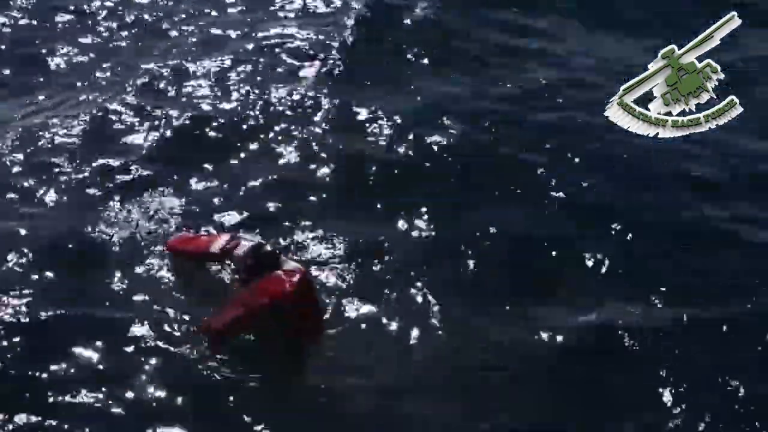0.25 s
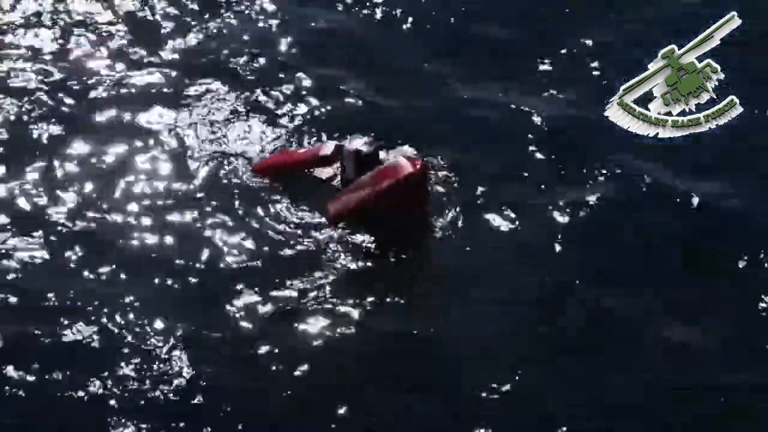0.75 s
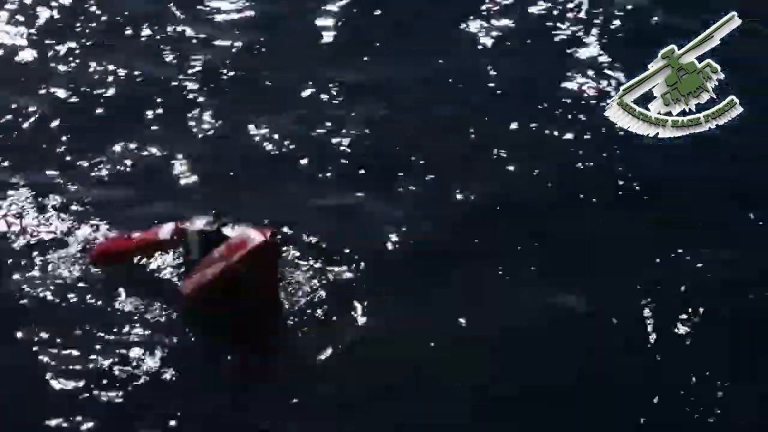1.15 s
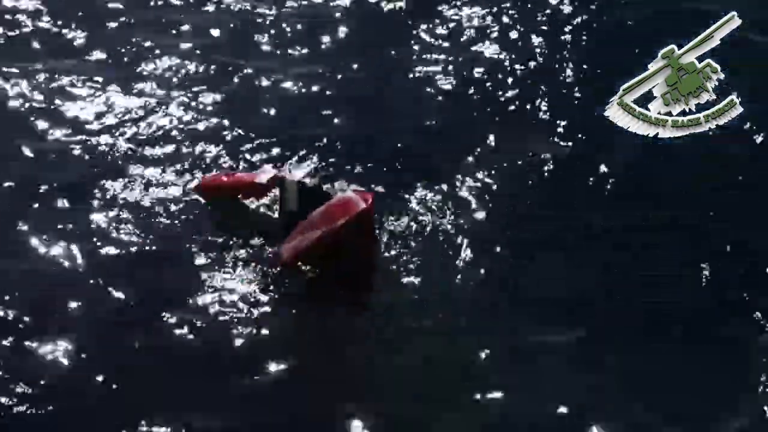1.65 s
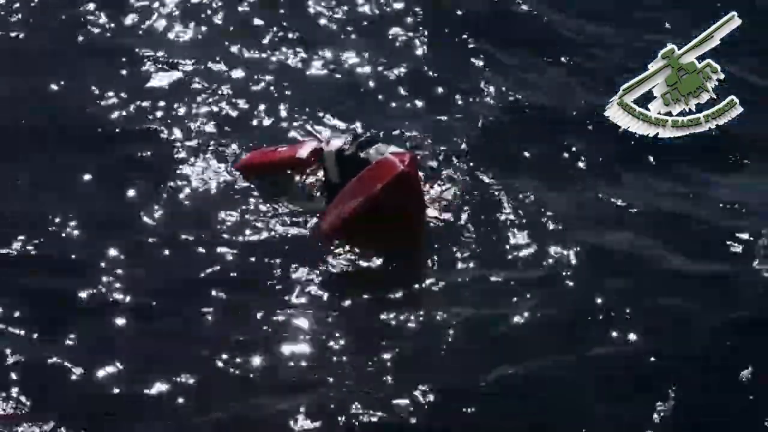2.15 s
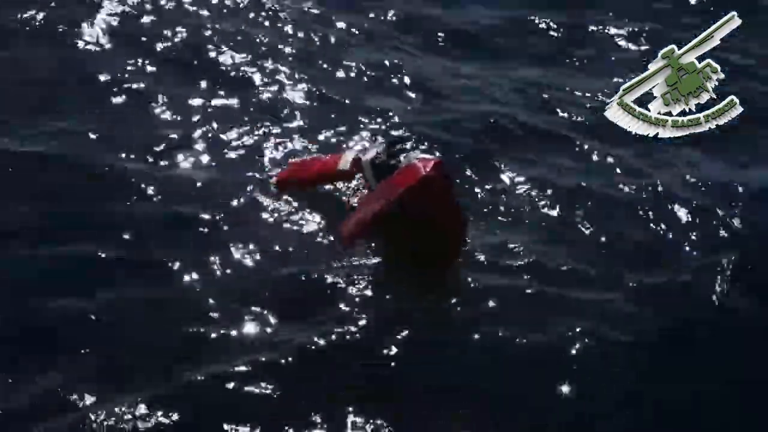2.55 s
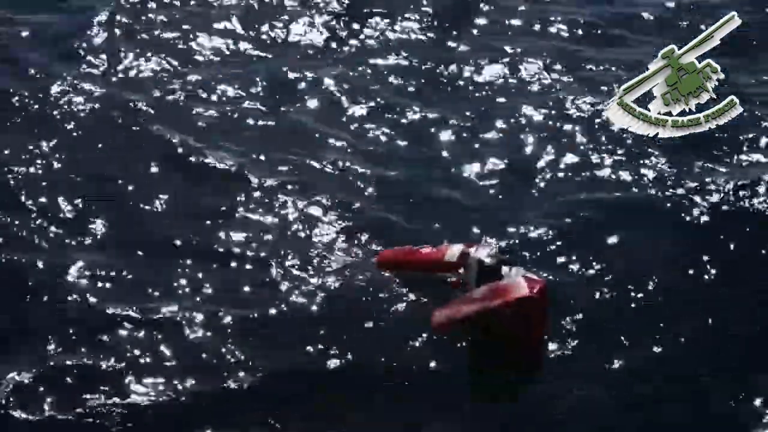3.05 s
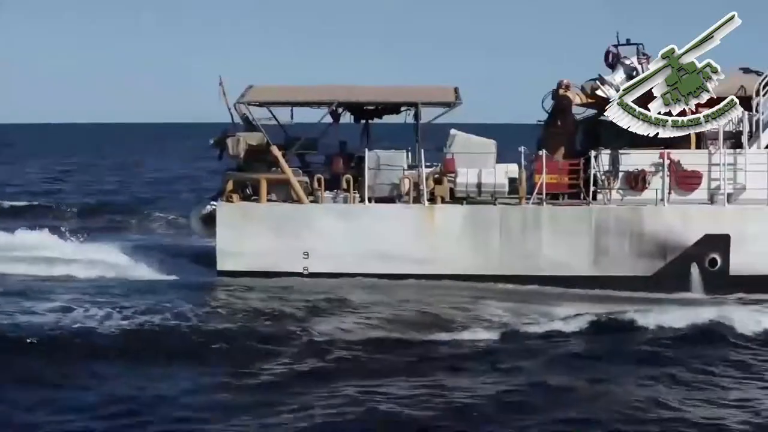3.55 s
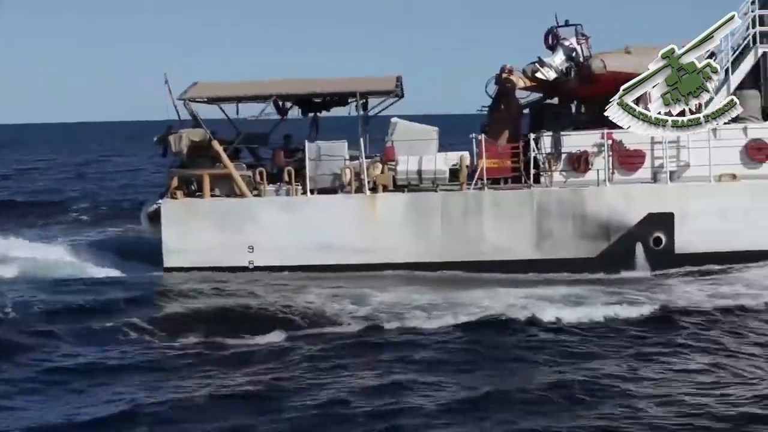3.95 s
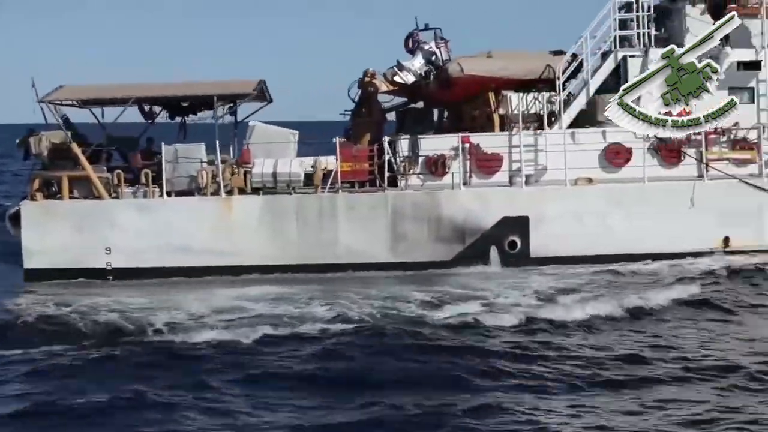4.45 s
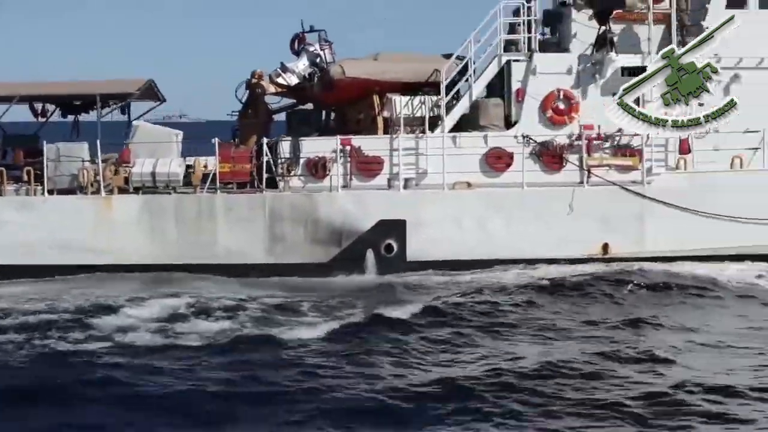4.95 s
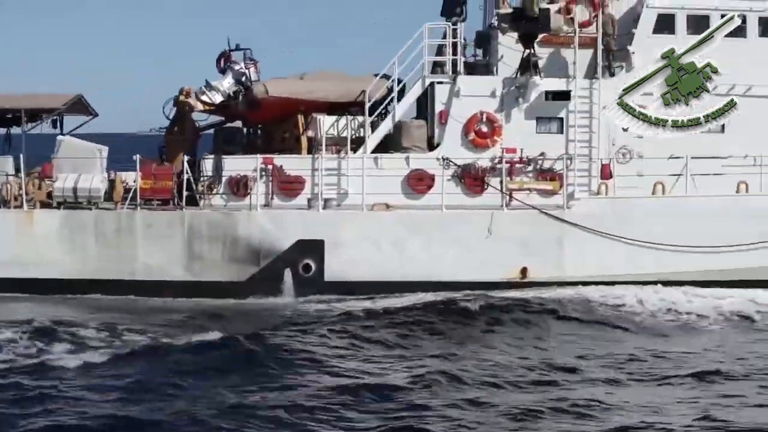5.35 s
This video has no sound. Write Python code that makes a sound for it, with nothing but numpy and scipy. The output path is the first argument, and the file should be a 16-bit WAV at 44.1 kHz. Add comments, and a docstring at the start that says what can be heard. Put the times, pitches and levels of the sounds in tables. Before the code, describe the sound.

Quiet sea wash, gusts on the microphone and a few ticks give way abruptly to a boat's loud diesel engine and rushing spray.

```python
"""On deck at sea. First, water washes round a small floating wreck under a thin whirr, while eddies of
wind pluck at the microphone and a few sharp ticks sound, the first with a ringing knock.
At 3.5 s, all at once, a patrol boat runs past close by. Its big diesel clatters and slowly gains speed,
the firings boom in the shifting resonances of the exhaust, and the wake hisses along the hull."""
import sys
import numpy as np
from scipy import signal
from scipy.fft import rfft, irfft, next_fast_len
from scipy.io import wavfile
from scipy.ndimage import uniform_filter1d, map_coordinates

SR = 44100
rng = np.random.default_rng(int(sys.argv[2]) if len(sys.argv) > 2 else 0)


def bounce(signal):
    """Save signal as a 16-bit WAV file at the path given by the first command-line argument."""
    frames = np.transpose(np.atleast_2d(signal))
    limited = np.clip(frames, -1, 1)
    pcm = np.round(limited * 32767).astype(np.int16)
    wavfile.write(sys.argv[1], SR, pcm)


N = 246959
T = np.arange(N) / SR


def from_db(db):
    """Decibels to gain."""
    return 10 ** (np.asarray(db) / 20)


def rms_one(x):
    """Scale to unit rms."""
    return x / np.sqrt(np.mean(x ** 2) + 1e-20)


def in_time(rows):
    """Each column after the time column, interpolated at every sample."""
    s, *columns = np.transpose(rows)
    return [np.interp(T, s, c) for c in columns]


def drift(rate_hz):
    """Smooth random wander with a spread of about 1."""
    hop, settle = 40, 2000
    pole = np.exp(-2 * np.pi * hop * rate_hz / SR)
    noise = rng.standard_normal(N // hop + settle + 2)
    slow = signal.lfilter([1], [1, -2 * pole, pole * pole], noise)[settle:]
    return np.interp(np.arange(N) / hop, np.arange(len(slow)), rms_one(slow))


def swell(at_s, half_width_s):
    """A bell-shaped rise and fall with peak 1."""
    return np.exp(-np.minimum(((T - at_s) / half_width_s) ** 2, 50))


def tone(turns, wobble_rad, wobble_hz):
    """A sine whose phase wanders; rms 1."""
    return np.sqrt(2) * np.sin(2 * np.pi * turns + wobble_rad * drift(wobble_hz))


def filtered(x, hz, kind):
    """A gentle low-, high- or band-pass."""
    return signal.sosfilt(signal.butter(2, hz, kind, fs=SR, output="sos"), x)


def sliding_band(x, centre_hz, width_hz):
    """A resonance whose centre may move; rms 1."""
    turn = np.exp(2j * np.pi * np.cumsum(centre_hz * np.ones(N)) / SR)
    return rms_one((filtered(x / turn, width_hz / 2, "low") * turn).real)


def coloured(x, spectrum):
    """Shape a sound to a spectrum that falls 48 dB an octave beyond its ends; rms 1."""
    hz, db = np.transpose(spectrum)
    size = next_fast_len(N)
    f = np.maximum(np.arange(size // 2 + 1) * SR / size, 1)
    octaves_outside = np.maximum(np.log2(hz[0] / f), 0) + np.maximum(np.log2(f / hz[-1]), 0)
    gain = from_db(np.interp(np.log(f), np.log(hz), db) - 48 * octaves_outside)
    return rms_one(irfft(rfft(x, size) * gain, size)[:N])


def fizz(per_s, spread_db, hiss_db):
    """Tiny bubbles of uneven size burst over a smooth hiss."""
    sizes = from_db(spread_db * np.minimum(rng.exponential(1, N), 4)) * rng.choice([-1, 1], N)
    pops = sizes * (rng.random(N) < per_s / SR)
    return rms_one(pops) + from_db(hiss_db) * rng.standard_normal(N)


# The water round the wreck, heard from the deck. Each row: time in seconds, liveliness in dB.
SEA_LIVELINESS = [(0.0, -1), (0.3, 0.5), (1.5, 1.5), (2.4, -1), (2.9, -3.5), (3.2, -4), (3.47, -7.5)]
# Its low wash and its bright ripples. Each row: frequency in Hz, relative level in dB.
WASH_SPECTRUM = [(15, -48), (25, -6.5), (70, -22), (113, -1.5), (152, -6.5), (226, -3.5), (315, -10),
                 (432, -6.5), (475, -12.5), (514, -7), (612, -16.5), (752, -14), (1100, -36), (1430, -55),
                 (2420, -120)]
RIPPLE_SPECTRUM = [(530, -29), (900, -2), (1090, -7.5), (1270, -8), (1550, -5), (1680, -4.5), (2330, -10.5),
                   (2590, -12.5), (3960, -25), (5700, -33.5), (7380, -27.5), (8400, -33), (9900, -27.5),
                   (13300, -41.5), (14900, -51)]

def sea(wash_db=-49.5, ripple_db=-58):
    """A low wash and fizzing ripples rise and fall with the water, the wash more widely."""
    lively_db, = in_time(SEA_LIVELINESS)
    wash_gain = from_db(wash_db + 1.38 * lively_db + 1.2 * drift(32))
    wash = wash_gain * coloured(rng.standard_normal(N), WASH_SPECTRUM)
    ripple_gain = from_db(ripple_db + lively_db + .5 * drift(21))
    bubbles = fizz(per_s=3000, spread_db=16, hiss_db=24)
    return wash + ripple_gain * coloured(bubbles, RIPPLE_SPECTRUM)


# A faint whirr out over the water. Each row: time in seconds, level in dB.
WHIRR_LEVEL = [(0, -61), (.65, -61.5), (.8, -56.5), (1.3, -58), (1.5, -60), (1.7, -56), (2.15, -56.5),
               (2.3, -64.5), (2.6, -60), (3.45, -64)]
# Where it sings out. Each row: time of the peak in seconds, level in dB, pitch in Hz.
WHIRR_NOTES = [(0.22, -50, 1330), (1.06, -57, 1265), (1.61, -54.5, 1410), (1.65, -51.5, 1280),
               (1.81, -56, 1226), (2.51, -58.5, 1345), (2.86, -61, 1350), (3.16, -57, 1200)]

def whirr(rise_s=.021, fall_s=.031):
    """A narrow band of noise wavers, and brief tones swell out of it."""
    notes = 0
    for s, db, hz in WHIRR_NOTES:
        envelope = np.exp(-np.maximum((s - T) / rise_s, (T - s) / fall_s))
        notes += from_db(db) * envelope * tone(hz * T, wobble_rad=.5, wobble_hz=25)
    gain = from_db(in_time(WHIRR_LEVEL)[0] + drift(6.4))
    return notes + gain * sliding_band(rng.standard_normal(N), 1300 + 25 * drift(.44), width_hz=230)


# Crests, faint on the open water, later loud against the hull. Each row: time of the peak in seconds,
# half-width in seconds, level in dB, centre in Hz, bandwidth in Hz.
BREAKING_CRESTS = [(0.346, 0.055, -77, 9000, 4000), (1.279, 0.019, -61, 2850, 800),
                   (1.27, .07, -76, 9000, 5000), (1.786, 0.22, -62.5, 1970, 1040),
                   (2.079, 0.012, -62, 3460, 900), (2.267, .015, -71, 7520, 7000),
                   (2.732, 0.07, -73, 7210, 3000), (3.67, 0.026, -39.5, 3100, 1500),
                   (3.783, 0.024, -37, 2830, 1250), (3.882, 0.012, -43, 3720, 1400),
                   (3.987, .04, -44, 2800, 1200), (4.09, .015, -44, 2900, 1200),
                   (4.2, 0.048, -46, 2700, 1100), (4.315, .018, -47, 2600, 800),
                   (4.47, .016, -42.5, 2670, 900), (4.537, 0.037, -37, 1990, 895),
                   (4.62, 0.018, -39.5, 2100, 1390), (5.4, 0.034, -40.5, 2280, 1490),
                   (5.41, .03, -54, 8000, 6000), (5.53, .025, -56, 8000, 5000)]

def crests():
    """Each breaking crest is a brief swell of fizzing bubbles."""
    foam = fizz(per_s=2300, spread_db=8.5, hiss_db=3)
    out = 0
    for s, half_width_s, db, hz, width in BREAKING_CRESTS:
        hiss = rms_one(filtered(foam, [hz - width / 2, hz + width / 2], "band"))
        out += from_db(db) * swell(s, half_width_s) * hiss
    return out


# Sharp ticks, heard from the deck. Each row: start in seconds, then the relative levels in dB
# of the whole tick, its rattle, its treble and its tail.
SHARP_TICKS = [(0.532, -56.5, 26, 1, 2), (1.219, -49, -7, -1, -12), (1.275, -55, 7, -10, -10),
               (1.575, -54, 1, 7, -16), (2.071, -50.5, -0.5, 8.5, -8), (2.127, -49, -10, 7, -21),
               (2.669, -55, 21.5, 0, 5), (3.089, -44.5, 16, -9, -6), (3.092, -39, 7, -6, -2.5),
               (3.29, -48, -10, -3, -11)]
# The rattle under a tick. Each row: frequency in Hz, relative level in dB.
RATTLE_SPECTRUM = [(700, 4), (1250, 18), (1900, 17), (2600, 5.5), (3600, -7)]

def ticks(rise_s=.00036, crack_s=.0011, tail_s=.011):
    """A dry crack and a short rattling tail, each tick with its own brightness."""
    rattle = coloured(rng.standard_normal(N), RATTLE_SPECTRUM)
    edge = rms_one(filtered(rng.standard_normal(N), [2700, 6400], "band"))
    treble = rms_one(filtered(rng.standard_normal(N), [5500, 10600], "band"))
    out = np.zeros(N)
    for s, db, rattle_db, treble_db, tail_db in SHARP_TICKS:
        span = slice(int(s * SR), int((s + .1) * SR))
        age = T[span] - T[span][0]
        rise = 1 - np.exp(-age / rise_s)
        fall = np.exp(-age / crack_s) + from_db(tail_db) * np.exp(-age / tail_s)
        noise = from_db(rattle_db - 5) * rattle[span] + edge[span] + from_db(treble_db) * treble[span]
        out[span] += from_db(db - 13.5) * rise * fall * noise
    return out


# The ring of the first tick. Each row: pitch in Hz, relative level in dB, seconds to fall by 60 dB.
RING_MODES = [(1389, -11, .09), (1760, -4, .035), (2000, 0, .025), (2600, -9, .028)]

def knock(start_s=.533, level_db=-34.5, rise_s=.00085):
    """One knock is hard enough to set a few modes ringing."""
    age = np.clip(T - start_s, 0, 1)
    ring = sum(from_db(level_db + db - 60 * age / t60) * np.sin(2 * np.pi * hz * age)
               for hz, db, t60 in RING_MODES)
    return (1 - np.exp(-age / rise_s)) * ring


def eddies(rows, width_cycles):
    """Each eddy is a short wiggle of pressure, given by its time, level and pitch."""
    out = np.zeros(N)
    for (s, db, hz), phase in zip(rows, rng.random(len(rows))):
        span = slice(max(int((s - .08) * SR), 0), int((s + .08) * SR))
        turns = (T[span] - s) * hz
        envelope = from_db(db) / np.cosh(np.clip(turns / width_cycles, -50, 50))
        out[span] += envelope * np.cos(2 * np.pi * (turns + phase))
    return out


# Gusts across the microphone. Each row: start in seconds, length in seconds, typical eddy level in dB,
# typical pitch in Hz.
WIND_GUSTS = [(0.13, 0.23, -39.5, 240), (1.121, 0.17, -38, 376), (1.856, 0.097, -36.5, 302),
              (2.18, .3, -40, 316), (2.599, .12, -38.5, 316), (2.975, 0.16, -40.5, 280)]

def gusts(eddies_per_s=45, spread_octaves=.52, count=40):
    """Each gust sheds a flurry of small eddies at uneven intervals."""
    rows = []
    for start, length, db, hz in WIND_GUSTS:
        delay = (np.arange(count) + rng.random(count)) / eddies_per_s
        drop_db, pitch = rng.standard_normal((count, 2)).T
        flurry = np.c_[start + delay, db - drop_db, hz * 2 ** (spread_octaves * pitch)]
        rows += list(flurry[delay < length])
    return eddies(rows, width_cycles=.49)


# Hard buffets and one heavy thump, right on the microphone.
# Each row: time in seconds, relative level in dB, pitch in Hz.
WIND_BUFFETS = [(0.21, -30, 230), (0.319, -28, 190), (0.347, -30, 340), (0.354, -33, 280),
                (0.397, -25, 222), (0.405, -28.5, 250), (0.416, -33, 237), (0.468, -30.5, 228),
                (0.475, -33, 171), (0.55, -32, 300), (0.556, -30, 252), (0.586, -30.5, 209),
                (0.715, -33.5, 300), (1.087, -25, 160), (1.1, -19, 370), (1.11, -28, 620),
                (1.116, -21.5, 316), (1.1357, -24, 400), (1.159, -34, 447), (1.188, -29, 310),
                (1.866, -28.5, 216), (1.886, -25.5, 358), (1.939, -25, 264), (1.962, -21, 400),
                (2.052, -32.5, 277), (2.209, -29.5, 340), (2.269, -30.5, 366), (2.316, -31, 213),
                (2.366, -30.5, 407), (2.4, -29, 404), (2.453, -26.5, 310), (2.613, -27, 380.5),
                (2.632, -33, 279), (2.659, -25, 370), (2.775, -32, 437), (2.803, -30.5, 352),
                (2.898, -27.5, 490), (2.968, -29.5, 360), (3.06, -37, 300), (3.074, -33, 507),
                (3.11, -31, 401), (3.194, -37, 283), (3.202, -27.5, 327), (3.224, -37, 303)]
WIND_THUMP = [(1.0955, -18.5, 255)]
# The crisp edge of a buffet. Each row: frequency in Hz, relative level in dB.
SPUTTER_SPECTRUM = [(380, 6), (650, 3.5), (1000, -2.5), (1500, -9.5)]

def wind(scatter_s=.00647, snap_s=.0045):
    """Amid the gusts, hard eddies hit the microphone, each with a sputter and a weaker eddy near it."""
    s, db, hz = np.transpose(WIND_BUFFETS)
    when, size, pitch = rng.standard_normal((len(s), 3)).T
    weaker = np.c_[s + scatter_s * when, db - 14 + 1.5 * size, .8 * hz * np.exp(.2 * pitch)]
    snaps = sum(from_db(level) * swell(at, snap_s) for at, level in zip(s, db))
    sputter = from_db(-20.5) * snaps * coloured(rng.standard_normal(N), SPUTTER_SPECTRUM)
    buffets = from_db(-2.5) * eddies(WIND_BUFFETS, width_cycles=.23) + eddies(weaker, width_cycles=1)
    pressure = buffets + sputter + gusts() + eddies(WIND_THUMP, width_cycles=.4)
    return filtered(pressure, 95, "high")   # the microphone passes little deep bass


# The wake along the passing hull. Each row: time in seconds, relative level in dB.
WAKE_LEVEL = [(3.52, 2.5), (3.69, 3.5), (3.88, 0.5), (3.96, -1.5), (4.3, -1.8), (4.62, -1.5), (4.71, -4),
              (4.85, -2), (5.03, -3.5), (5.12, -1.5), (5.26, -3), (5.4, -1.8), (5.6, -3.5)]
# Its spray. Each row: frequency in Hz, relative level in dB.
SPRAY_SPECTRUM = [(2650, -8), (4500, 0.5), (5150, -7.5), (5990, -5), (6930, 0), (8770, -4.5), (10300, -1),
                  (13600, -13.5), (14900, -21)]

def spray(level_db=-50, surge_db=1.3, split_hz=7000):
    """Two sheets of spray hiss, one duller and one brighter, each surging by itself."""
    wake_db = level_db + in_time(WAKE_LEVEL)[0]
    out = 0
    for kind in ("low", "high"):
        sheet = coloured(fizz(per_s=3100, spread_db=5, hiss_db=1), SPRAY_SPECTRUM)
        out += from_db(wake_db + surge_db * drift(5.1)) * filtered(sheet, split_hz, kind)
    return out


def firings(cycle, repeat_share, uneven_db, decay_slots=.99, cylinders=16, size=4410):
    """Cylinders fire in turn, each repeating its own burst every cycle, mixed with fresh turbulence."""
    slot = np.arange(size) * cylinders / size
    strengths = from_db(uneven_db * rng.standard_normal(cylinders))
    envelope = strengths[slot.astype(int)] * np.exp(-(slot % 1) / decay_slots)
    position = cycle % 1 * size
    bursts = rms_one(irfft(np.exp(2j * np.pi * rng.random(size // 2 + 1)), size))
    repeating = map_coordinates(bursts, [position], order=3, mode="grid-wrap")
    noise = np.sqrt(repeat_share) * repeating + np.sqrt(1 - repeat_share) * rng.standard_normal(N)
    return np.interp(position, np.arange(size), envelope) * noise


# The midrange of engine and water, close by. Each row: frequency in Hz, relative level in dB.
CLATTER_SPECTRUM = [(540, -12.5), (590, -1.5), (700, -2.5), (1000, 0.5), (1220, 3.5), (1350, -1.5),
                    (1520, 0), (1850, -2), (2150, -0.5), (2400, -4), (2700, -5.5), (3350, -16),
                    (3900, -17.5), (4150, -25), (5500, -27)]

def clatter_and_churn(cycle, pass_db):
    """The firings clatter, and bubbles churn along the hull in the same range of pitch."""
    clatter_gain = from_db(-34.5 + pass_db + .5 * drift(23))
    clatter = coloured(firings(cycle, repeat_share=.55, uneven_db=2), CLATTER_SPECTRUM)
    churn = coloured(fizz(per_s=3400, spread_db=2, hiss_db=6.5), CLATTER_SPECTRUM)
    return clatter_gain * clatter + from_db(-36.5 + pass_db) * churn


# The deep boom off the stern. Each row: frequency in Hz, relative level in dB.
RUMBLE_SPECTRUM = [(18, -38), (50, -12), (110, -16), (170, -9.5), (225, 2), (290, -1), (375, 9), (420, -19),
                   (550, 3.5)]

def rumble(cycle, stern_db):
    """Uneven, mostly turbulent firings boom while the stern is near."""
    pulses = firings(cycle, repeat_share=.2, uneven_db=3)
    return from_db(-36.5 + stern_db) * coloured(pulses, RUMBLE_SPECTRUM)


# Machinery aboard the passing boat. Each row: pitch in Hz, relative level in dB.
MACHINE_WHINES = [(1497, -42), (1722, -49), (2083, -52), (2639, -49.5)]

def whines(stern_db, waver_db=5.5):
    """Machinery sings in wavering tones, strongest while the stern is near."""
    return sum(from_db(db + .95 * stern_db + waver_db * drift(9.6))
               * tone(hz * T, wobble_rad=1.76, wobble_hz=7.6) for hz, db in MACHINE_WHINES)


# The diesel's drone. Each row: multiple of the cycle rate (rounded when played), relative level in dB,
# share of the stern's level that it follows.
DIESEL_ORDERS = [(17, -55.5, -0.033), (19, -52, -0.11), (26, -49, 0.94), (29, -42.5, 0.93),
                 (44, -47, -0.0095), (50, -45, 0.39), (59, -46, 0.6), (66.9, -46, 0.54), (78.7, -49, 0.4),
                 (86.3, -49, 0.52), (94.7, -51, 0.81), (104.6, -51, 0.073), (112.5, -53, 0.49),
                 (125, -55, 0.67), (155.4, -53, -0.045)]

def engine_orders(cycle, stern_db, waver_db=2.5):
    """The strongest harmonics of the engine cycle stand out as wavering tones."""
    out = 0
    for multiple, db, share in DIESEL_ORDERS:
        harmonic = tone(round(multiple) * cycle + rng.random(), wobble_rad=.44, wobble_hz=4.2)
        out += from_db(db + share * stern_db + waver_db * drift(2.35)) * harmonic
    return out


# The exhaust's lowest resonance, which stays put. Each row: centre in Hz, width in Hz, level in dB.
EXHAUST_BASS = [(184, 56, -49.5)]
# Five higher ones slide and swell as the boat moves past the microphone.
# Each row: time in seconds, centre in Hz, level in dB.
EXHAUST_GROWL = [(3.52, 292, -41.5), (3.66, 285, -34.5), (3.8, 272.5, -32), (3.97, 278.3, -33),
                 (4.15, 280, -35.5), (4.35, 279, -46.5), (5.6, 286, -47.5)]
EXHAUST_DRONE = [(3.52, 450, -30.5), (3.66, 478, -38), (3.78, 462, -43), (4.1, 510, -38.5), (4.2, 452, -42),
                 (4.36, 461, -38.5), (4.9, 471, -39), (5.08, 444, -45), (5.25, 460, -42), (5.6, 457, -46)]
EXHAUST_HOWL = [(3.52, 854, -29.5), (3.6, 793, -29.5), (3.73, 781, -29.5), (3.87, 734, -31),
                (3.98, 720, -38.5), (4.15, 794, -40.5), (4.29, 885, -34), (4.55, 840, -35), (4.7, 805, -34),
                (4.85, 884, -38.5), (4.96, 874, -33.5), (5.12, 814, -42), (5.21, 760, -36.5),
                (5.41, 802, -37.5), (5.6, 790, -39)]
EXHAUST_UPPER_HOWL = [(3.52, 956, -31), (3.61, 915, -40), (3.68, 1113, -33.5), (3.85, 972, -32),
                      (4.0, 930, -41.5), (4.27, 920, -44.5), (4.48, 1055, -35), (4.66, 1030, -39.5),
                      (4.82, 1090, -41.5), (5.05, 1000, -38.5), (5.25, 1146, -45.5), (5.42, 1190, -40),
                      (5.6, 1165, -48)]
EXHAUST_RASP = [(3.55, 1810, -39), (3.63, 1810, -42), (3.74, 1735, -35), (3.92, 1890, -42.5),
                (4.13, 1810, -42), (4.33, 1870, -40.5), (4.5, 1910, -41.5), (4.7, 1884, -39.5),
                (4.88, 1880, -50), (5.05, 1800, -42), (5.19, 1830, -39.5), (5.32, 1835, -45),
                (5.6, 1800, -46)]
# Those five in order. Each row: width in Hz, widening in octaves once the stern is far.
EXHAUST_WIDTHS = [(32, 0), (75, 0), (70, 1.0), (100, 0), (120, 0)]

def exhaust(cycle, stern_db, wander_db=1.43):
    """The firings boom in six resonances, each swelling and sinking by itself."""
    pulses = firings(cycle, repeat_share=.45, uneven_db=1)
    resonances = [(hz, width, 0, db) for hz, width, db in EXHAUST_BASS]
    slides = EXHAUST_GROWL, EXHAUST_DRONE, EXHAUST_HOWL, EXHAUST_UPPER_HOWL, EXHAUST_RASP
    for slide, (width, widening) in zip(slides, EXHAUST_WIDTHS):
        hz, db = in_time(slide)
        resonances.append((hz, width, widening, db))
    away = np.clip(-stern_db / 10, 0, 1)
    out = 0
    for hz, width, widening, db in resonances:
        boom = sliding_band(pulses, hz, width)
        if widening:
            boom = (1 - away) * boom + away * sliding_band(pulses, hz, width * 2 ** widening)
        boom /= np.sqrt(uniform_filter1d(boom ** 2, size=3000) + 1e-6)   # an even load holds it steady
        out += from_db(db + wander_db * drift(4.7)) * boom
    return out


# The diesel gaining speed. Each row: time in seconds, four-stroke cycles per second.
DIESEL_SPEED = [(3.5, 9.63), (4.1, 9.9), (4.5, 9.94), (4.85, 10.02), (5.6, 10.24)]
# The boat passing close to the microphone, and the boom of its stern, strongest when near.
# Each row: time in seconds, relative level in dB.
PASS_LEVEL = [(3.52, 3.5), (3.64, 3.5), (3.76, 6), (3.97, -2), (4.55, -0.5), (4.72, -4), (4.95, -3.5),
              (5.2, -2), (5.6, -3.5)]
STERN_LEVEL = [(3.52, -6.5), (3.72, 2), (4.1, -3), (4.35, -11), (4.62, -20), (4.97, -10.5), (5.6, -14)]

def patrol_boat():
    """One diesel drives clatter, rumble, exhaust and drone, amid whines and spray."""
    cycle = np.cumsum(in_time(DIESEL_SPEED)[0]) / SR
    pass_db, stern_db = in_time(PASS_LEVEL)[0], in_time(STERN_LEVEL)[0]
    hull = clatter_and_churn(cycle, pass_db) + rumble(cycle, stern_db) + whines(stern_db) + spray()
    return hull + exhaust(cycle, stern_db) + engine_orders(cycle, stern_db)


def scene(boat_s=3.507, crossfade_s=.002):
    """Open water gives way abruptly to the boat; crests break through both. Mono."""
    boat_on = np.clip((T - boat_s) / crossfade_s + .5, 0, 1)
    open_water = sea() + whirr() + wind() + ticks() + knock()
    return ((1 - boat_on) * open_water + boat_on * patrol_boat() + crests())[None]


def record(dry, cutoff_hz=15000):
    """The highest treble is cut steeply."""
    return signal.sosfilt(signal.ellip(10, .1, 70, cutoff_hz, fs=SR, output="sos"), dry)


dry = scene()
out = record(dry)
bounce(out)
```